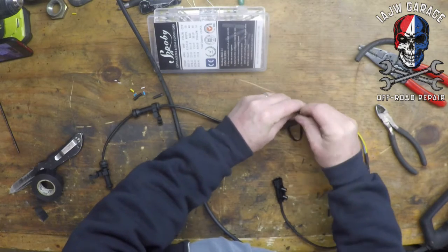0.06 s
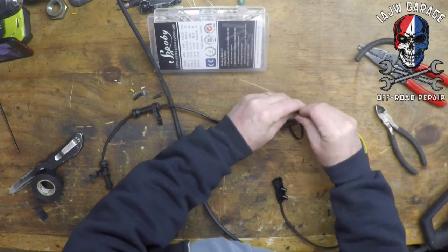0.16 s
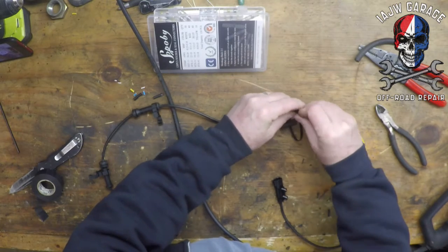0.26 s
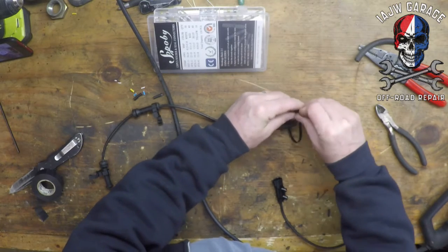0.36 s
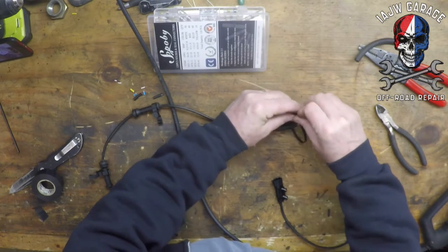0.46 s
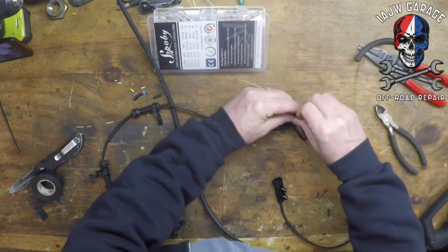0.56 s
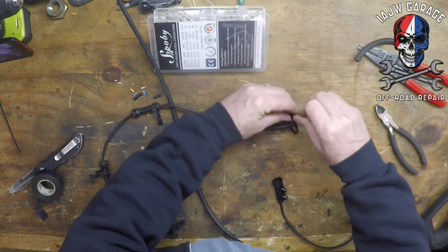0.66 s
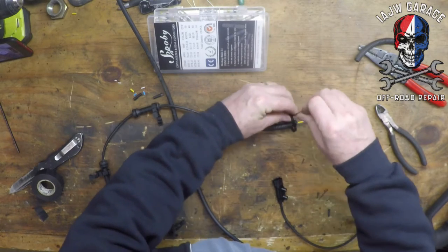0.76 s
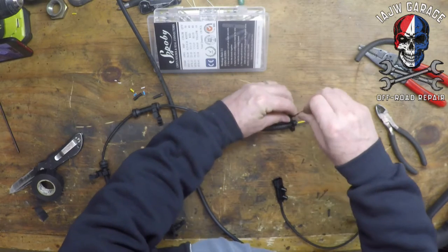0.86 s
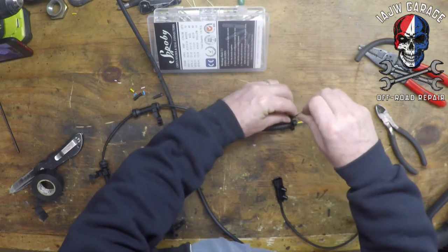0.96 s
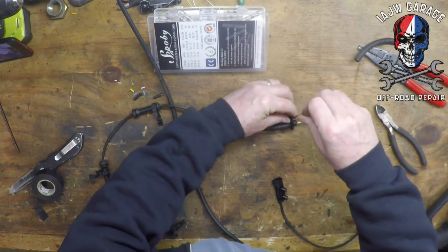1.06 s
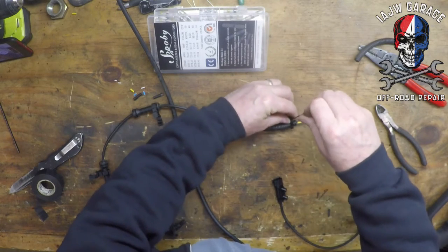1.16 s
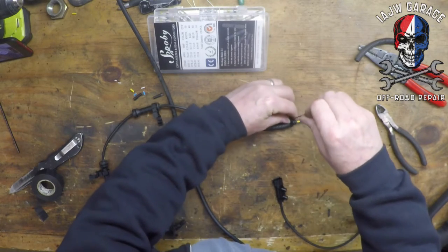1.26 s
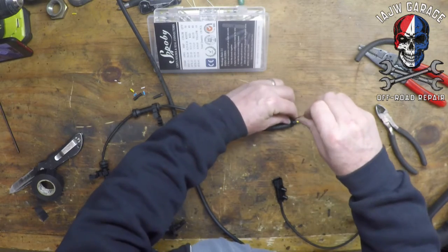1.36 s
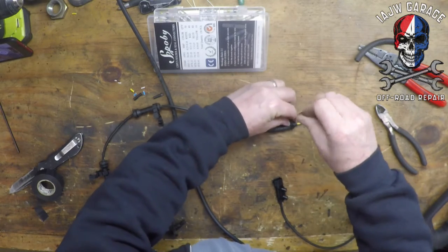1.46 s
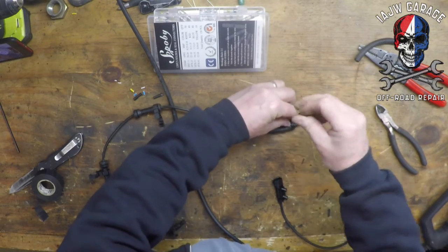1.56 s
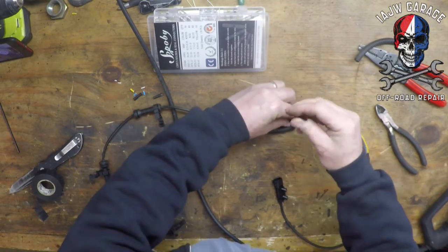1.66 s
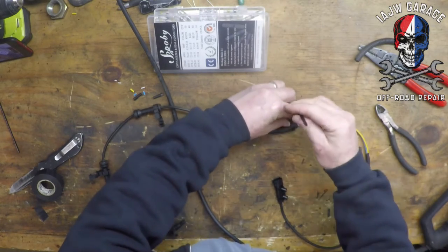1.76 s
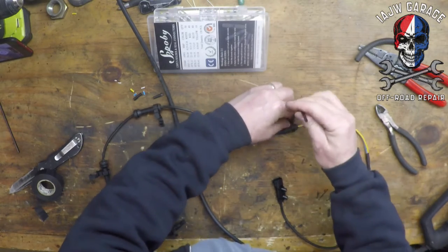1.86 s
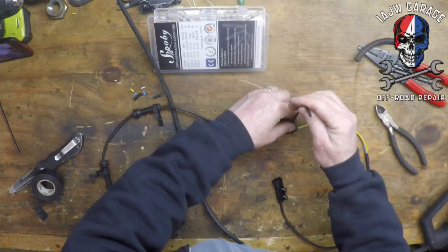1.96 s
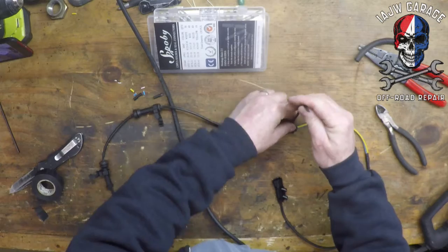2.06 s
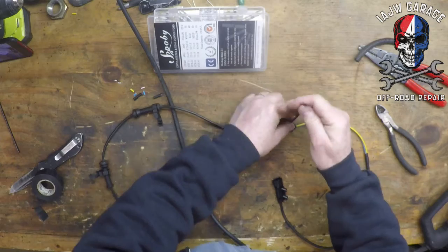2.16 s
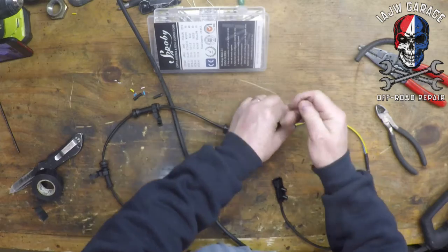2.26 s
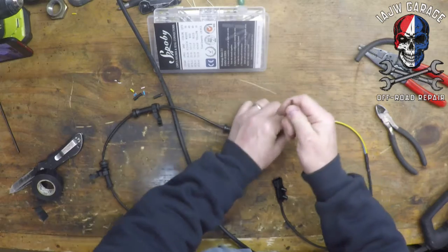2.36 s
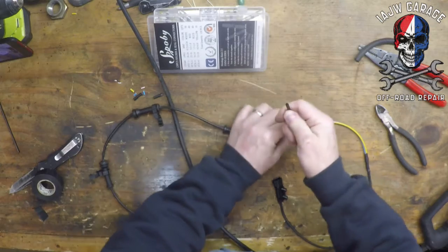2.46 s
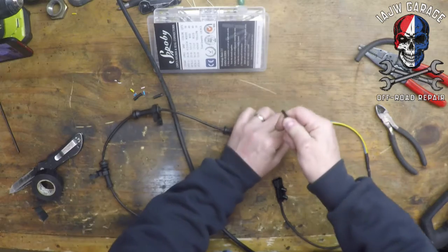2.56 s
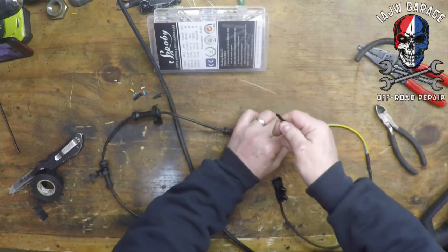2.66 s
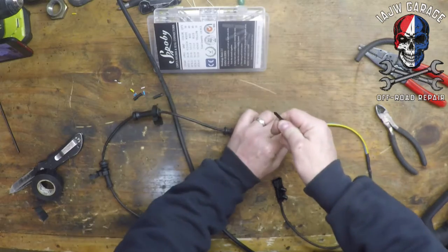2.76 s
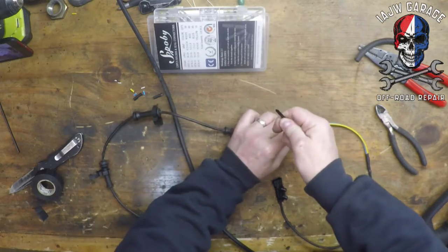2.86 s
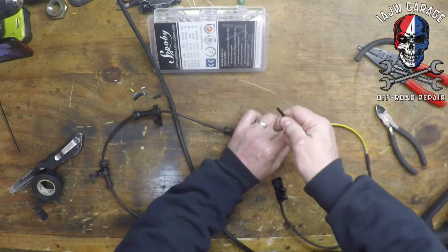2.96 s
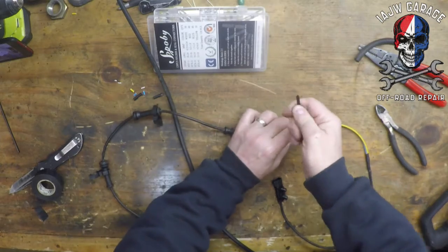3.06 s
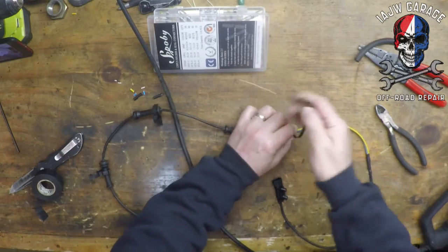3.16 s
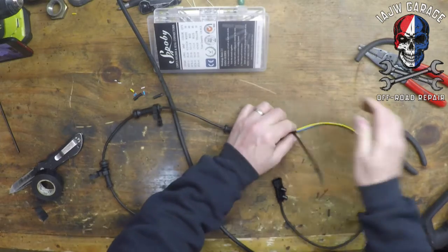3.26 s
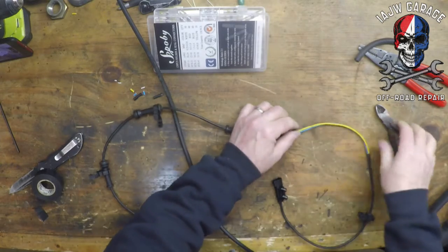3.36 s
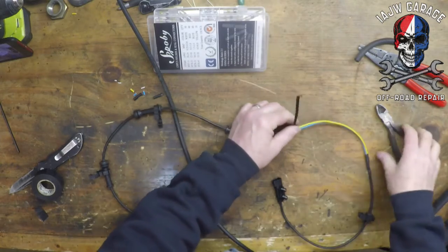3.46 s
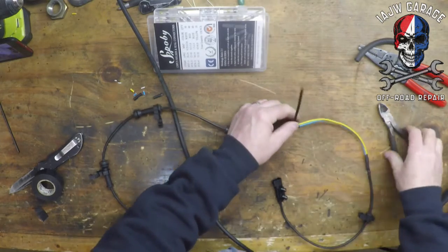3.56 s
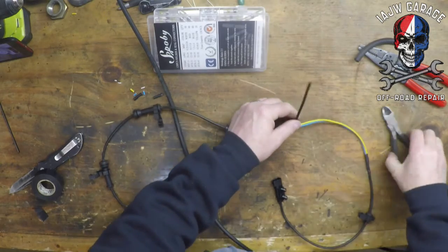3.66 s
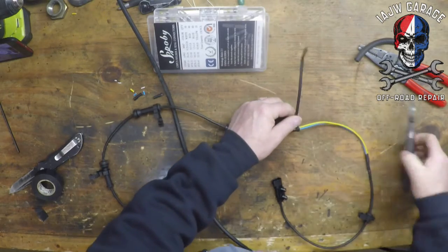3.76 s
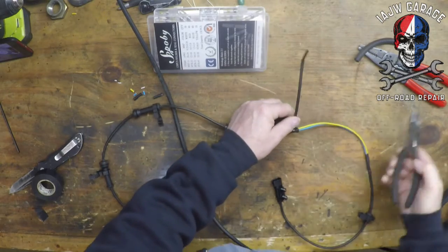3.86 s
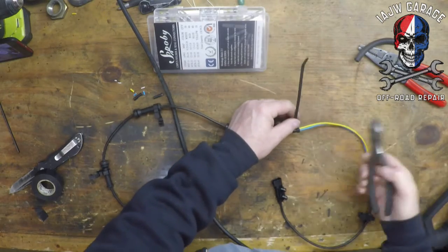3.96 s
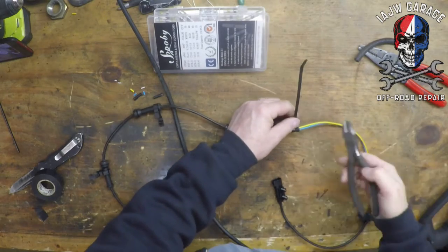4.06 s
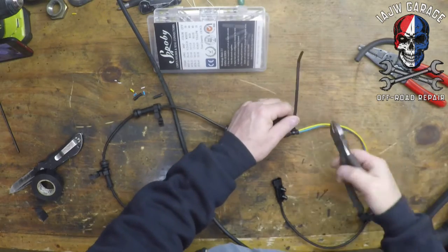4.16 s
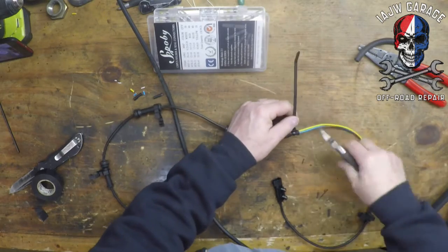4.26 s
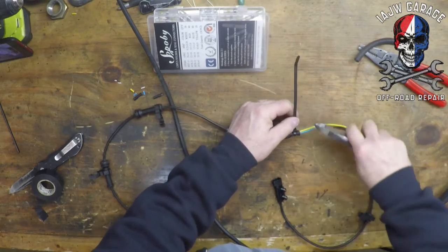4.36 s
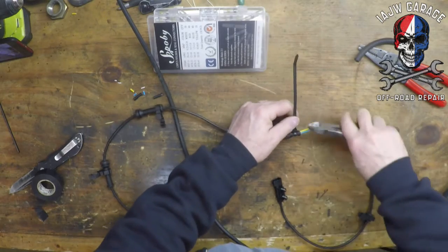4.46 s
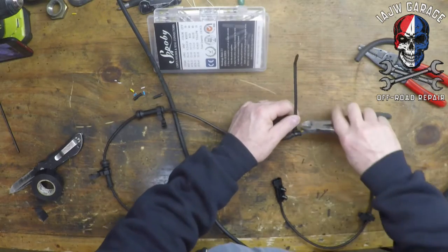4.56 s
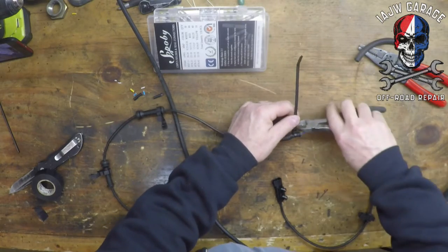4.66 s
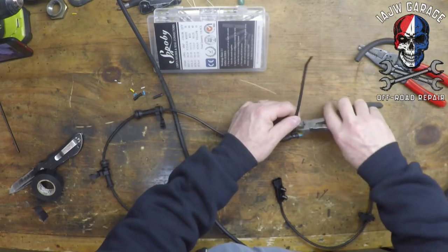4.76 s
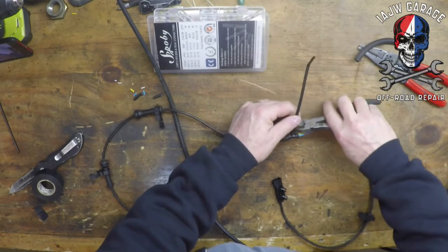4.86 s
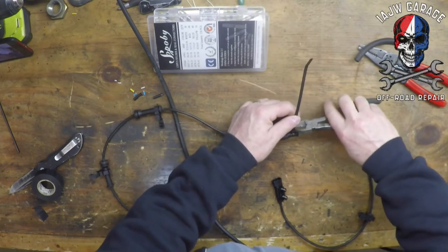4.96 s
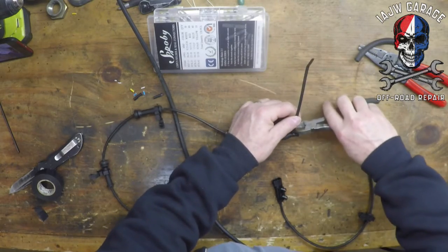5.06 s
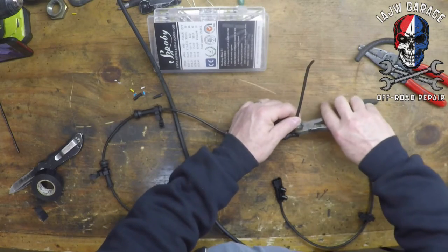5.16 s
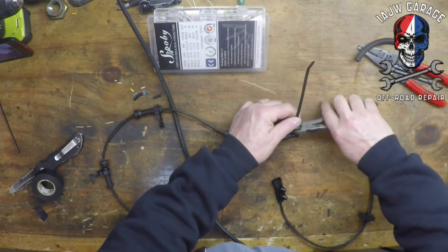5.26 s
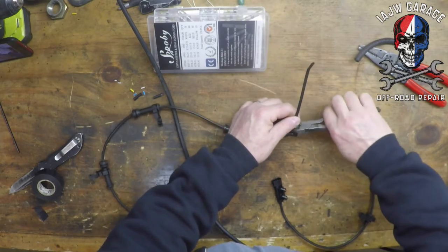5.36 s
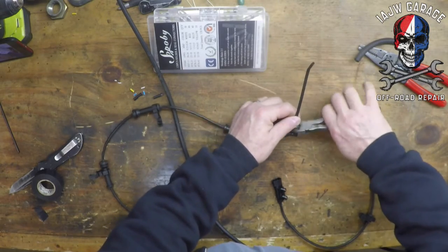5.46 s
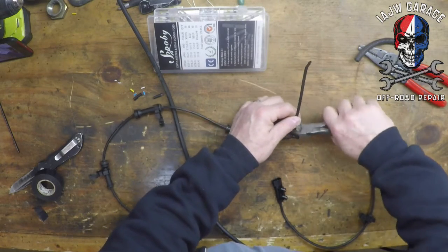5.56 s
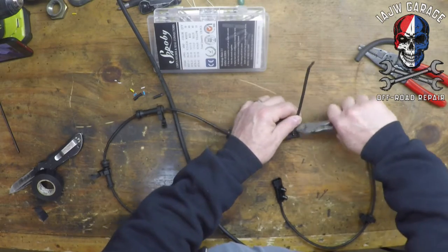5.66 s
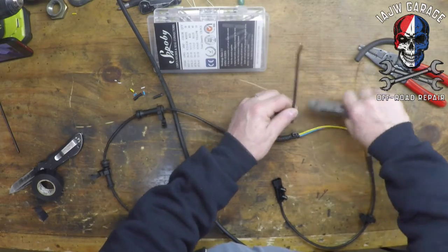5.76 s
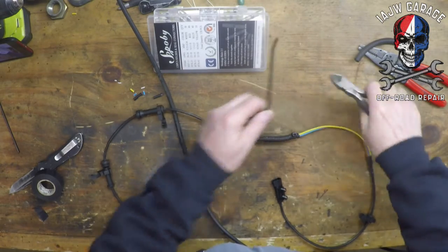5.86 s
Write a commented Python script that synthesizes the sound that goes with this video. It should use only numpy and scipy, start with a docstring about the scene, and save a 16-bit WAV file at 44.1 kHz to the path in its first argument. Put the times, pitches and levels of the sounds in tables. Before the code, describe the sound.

Two ratcheting rasps of a cable tie, a loud knock on wood and a sharp snip of cutters in a garage.

```python
"""A plastic cable tie is drawn tight over a wooden workbench in a garage. After a few light bumps, the
pawl rattles over the teeth in one long pull (0.6-1.4 s), each tooth exciting the modes of the tie. A
second, halting pull follows at 2.4 s. Hands and cable then rub and knock the bench, loudest at 3.7 s,
as cutters are picked up; at 5.7 s the jaws snip the tail off with a crack and a ring of steel.
The garage reverberates throughout, over faint air noise and hum."""
import sys
import numpy as np
from scipy import signal
from scipy.fft import rfft, irfft
from scipy.io import wavfile
from scipy.ndimage import uniform_filter1d

SR = 44100
rng = np.random.default_rng(int(sys.argv[2]) if len(sys.argv) > 2 else 0)


def transcribe(signal):
    """Save signal, clipped to [-1, 1], as a 16-bit WAV file at the path in sys.argv[1]."""
    frames = np.atleast_2d(signal).T
    limited = np.clip(frames, -1, 1)
    pcm = np.round(limited * 32767).astype(np.int16)
    wavfile.write(sys.argv[1], SR, pcm)


N = 261181

# Speed of the strap in the long pull. Each row: time in seconds, teeth per second.
PULL_SPEED = [(.6302, 69), (.6736, 370), (.6946, 516), (.7106, 504), (.7486, 314), (.7936, 185),
              (.8636, 160), (.9086, 58), (.9486, 141), (.9836, 70), (1.1136, 88), (1.1486, 116),
              (1.2586, 131), (1.2986, 92), (1.3586, 73), (1.4016, 10)]
# Snap of the pawl in the long pull.
# Each row: time in seconds, level in dB, treble lift in dB, damping of the loop from 0 to 1.
PULL_SNAP = [(.63, -35.5, 1, 0.8), (.69, -34.5, -1.5, 0.5), (.76, -35, -7, 0.12), (.86, -37.5, 0, 0.2),
             (.95, -37, -4.5, 0.02), (1.03, -40.5, 1.5, 0.14), (1.13, -42.5, 8, 0), (1.24, -40.5, 0, 0.56),
             (1.4, -42.5, 0, 0.86)]
# Single teeth of the halting pull.
# Each row: start in seconds, level in dB, damping of the loop from 0 to 1, treble lift in dB.
HALTING_TEETH = [(2.4123, -39, .05, 3), (2.4234, -37, .05, 0), (2.434, -37.5, .1, -9), (2.44, -37, .3, -4),
                 (2.449, -38, .1, .5), (2.46, -37, .3, 3), (2.478, -31, 0.6, -3), (2.5133, -39, .05, 5),
                 (2.528, -35, .4, 0), (2.5434, -39, .05, 2), (2.5536, -36, .05, 4), (2.5656, -36, .5, 1),
                 (2.5813, -39, 0.5, -1.5), (2.6034, -40, .7, -2), (2.6355, -41.5, 0.9, -2),
                 (2.6799, -43.5, .95, 0.5), (2.7145, -45, .95, -1.5), (2.7325, -46, .5, 3),
                 (2.7623, -47, 0.6, 0), (2.7819, -49.5, 0.8, 1), (2.814, -55, .6, -4)]
# The shrinking loop drops in pitch while the freed strap rises.
# Each row: time in seconds, tuning factor of the loop, tuning factor of the strap.
TUNING = [(.63, 1.07, .88), (.76, 1.1, .9), (.82, 1.02, .97), (.89, .99, 1.02), (1.0, .99, 1.0),
          (1.4, 1.0, 1.0)]
# Modes of the tie's five parts, low to high. Each row: frequency in Hz, bandwidth in Hz, level in dB.
LOOP_MODES = [(420, 220, -23.5), (870, 630, -16), (1847, 66, -24), (2460, 460, -1.5), (2780, 450, -44)]
STRAP_MODES = [(3260, 630, 3), (3750, 400, -11)]
TAIL_MODES = [(4120, 1250, -12), (5140, 610, -2.5), (5320, 2000, 3.5), (6280, 235, -11), (6120, 490, -17),
              (7090, 1360, -3)]
HEAD_MODES = [(9270, 1600, -2.5), (9700, 300, -10), (10430, 1270, -4.5), (10550, 440, -10)]
PAWL_MODES = [(12500, 1000, -41), (12100, 1080, -5), (13200, 2300, 0.5), (13800, 1300, -0.5),
              (15000, 550, -6)]
# Balance of those five parts. Each row: level in dB, change at full damping in dB, share of the
# treble lift, change in the halting pull in dB, further change once the head is pinched in dB.
PART_BALANCE = [(0.5, -8, -0.13, 1, -3.5), (-2, -3, 0.35, 3, -8.5), (.5, -1.5, -0.098, 3.5, 0),
                (-1.5, 2, 0.6, -4.5, 8), (2, 6.5, 0.74, -2.5, -7.5)]
# Spectrum of the cut. Each row: frequency in Hz, spectral density in dB.
SNIP_SPECTRUM = [(600, -12), (1400, -37), (1850, -10.5), (2400, 1.5), (3400, -13.5), (4100, -2.5),
                 (5300, 2), (6400, -5), (8000, -6.5), (11500, -15.5), (14300, -8.5), (15300, -22),
                 (16500, -47.5)]
# Modes of the cutters. Each row: frequency in Hz, level in dB, 60 dB decay time in seconds.
STEEL_MODES = [(1750, -20, .03), (1820, -15, .035), (2370, -18, .025), (4100, -23, .035), (4260, -27, .06),
               (4550, -24, .03), (4820, -17, .03), (5220, -13, .022), (5600, -20, .015), (6220, -19, .015)]
# Ticks and cracks of plastic and cable. Each row: start in seconds, level in dB, pitch in Hz.
PLASTIC_TICKS = [(0.102, -40.5, 3260), (0.338, -42, 3250), (.392, -41.5, 3370), (1.4618, -51, 1830),
                 (1.8891, -38.5, 3390), (2.393, -48, 3620), (2.434, -24, 4000), (2.4897, -12, 4610),
                 (2.4952, -18, 5000), (2.522, -22.5, 4510), (2.548, -25.5, 5100), (3.129, -49, 4900),
                 (3.632, -41.5, 4720), (4.5736, -48, 3530), (4.692, -51, 4600), (5.164, -56, 4950),
                 (5.562, -48.5, 4730), (5.6043, -45.5, 3780)]
# Bumps on the bench.
# Each row: start in seconds, blow level in dB, knock level in dB, weight in dB gained per octave down.
BENCH_BUMPS = [(0.121, -43, -70, -1), (0.327, -42.5, -76, 3), (.393, -45, -68, 2),
               (1.463, -39, -52.5, -8.5), (1.504, -39, -59, 10), (3.129, -33, -59, 12),
               (3.238, -36, -80, 11), (3.2875, -16.5, -42, -2.5), (3.553, -33.5, -61, 1),
               (3.589, -30.5, -62.5, 11.5), (3.682, -1.5, -35, 2), (3.695, -8.5, -52, -2),
               (3.712, -12.5, -57, -1.5), (4.21, -43.5, -61, 2), (4.549, -43, -60.5, -4),
               (4.825, -37.5, -62, 6), (5.3877, -20, -47, 0), (5.674, -23, -48, -6),
               (5.693, -14.5, -42, -1.5)]
# Modes of the bench. Each row: frequency in Hz, level in dB, 60 dB decay time in seconds.
WOOD_MODES = [(138, -23.5, 0.21), (239, -17.5, 0.099), (268, -9.5, 0.1), (314.7, -21, 0.13),
              (379, -15.5, 0.027), (419, -3, 0.083), (507, -11, 0.067), (626.4, -11, 0.079),
              (733, -17.5, 0.066), (858, -9, 0.043), (920, -15, 0.12), (1023, -13.5, 0.072),
              (1125, -11, 0.047), (1252, -17, 0.06)]
# Spectrum of a dry knock. Each row: frequency in Hz, spectral density in dB.
KNOCK_SPECTRUM = [(700, -6), (1500, -8.5), (2500, 0.5), (3500, -7.5), (5000, -15), (8000, -32),
                  (16000, -56)]
# Hands and cable dragging on the bench. Each row: start in seconds, length in seconds, level in dB.
DRAG_STROKES = [(0.748, 0.26, -57), (1.163, 0.21, -49), (2.422, 0.14, -36), (2.647, 0.33, -61),
                (3.154, 0.042, -52.5), (3.41, 0.11, -53.5), (3.626, 0.13, -37.5), (5.384, 0.028, -42.5),
                (5.646, 0.076, -43)]
# Resonances of the rubbed bench. Each row: frequency in Hz, bandwidth in Hz, spectral density in dB.
RUB_BANDS = [(137, 73, -7.5), (254.2, 32, 2.5), (322, 83, -6), (419, 80, -7), (714, 260, -22),
             (1003, 49, -24), (1250, 190, -38.5), (3000, 1200, -38.5)]
# Faint squeaks. Each row: centre in seconds, length in seconds, level in dB.
SQUEAK_EVENTS = [(.435, .05, -74), (4.723, 0.044, -73), (5.463, 0.1, -73)]
# A faint hiss while the cutters travel. Each row: time in seconds, level in dB.
HISS_LEVEL = [(3.55, -93), (3.65, -67.5), (4.22, -76), (4.35, -90)]
# Reverberation of the garage. Each row: frequency in Hz, level in dB, 60 dB decay time in seconds.
GARAGE_DECAY = [(154, -24, 0.046), (505, -16.5, 0.71), (1420, -13, 0.44), (2350, -12.5, 0.41),
                (3300, -13.5, 0.41), (4400, -14.5, 0.63), (4930, -8, 0.3), (6870, -21.5, 0.48),
                (15000, -8, 0.18)]
# Background hum. Each row: frequency in Hz, bandwidth in Hz, level in dB.
HUM_BANDS = [(40.4, 21.5, -57), (121.5, 2.2, -59.5), (431, 27, -73), (705.4, 22, -78.5), (1878, 98, -82.5),
             (5060, 540, -80.5)]
# Air noise and rumble. Each row: frequency in Hz, spectral density in dB.
AIR_SPECTRUM = [(12, -32), (20, -6), (48, 0.5), (65, -8), (123, -11), (146, -17.5), (248, -22), (367, -27),
                (558, -34.5), (1060, -40), (5080, -44.5), (14700, -56.5), (16000, -54)]

PINCH_S = 2.52   # fingers pinch the head
SWELL_S, SWELL_LENGTH_S, SWELL_DB = 1.245, .075, 8   # the tail rings louder late in the long pull
SWELL_HZ, SWELL_WIDTH_HZ = 4975, 300
HALTING_WIDEN = 1.02   # the gripped tie rings a little shorter in the halting pull
# Reflections of the rattle off the bench. Each row: delay in seconds, level in dB.
BENCH_ECHOES = ((.0018, -8), (.0037, -11), (.0062, -14))


def ratchet(pull, wander_db=2.0, uneven_db=1.0, detune=.015, spread_s=.0008, jitter_s=.000012):
    """Impulse excitation: each tooth flicks the pawl, and the tie's damped modes answer in turn."""
    snap_s, snap_db, snap_lift, snap_damping = np.transpose(PULL_SNAP)
    halt_s, halt_db, halt_damping, halt_lift = np.transpose(HALTING_TEETH)
    tuning_s, loop_tuning, strap_tuning = np.transpose(TUNING)
    times = np.append(pull, halt_s)
    halting = times > pull[-1]
    tunings = [np.interp(times, tuning_s, loop_tuning), np.interp(times, tuning_s, strap_tuning), 1, 1, 1]
    force_db = np.append(np.interp(pull, snap_s, snap_db), halt_db)
    lift_db = np.append(np.interp(pull, snap_s, snap_lift), halt_lift)
    damping = np.append(np.interp(pull, snap_s, snap_damping), halt_damping)
    swell_db = SWELL_DB * np.exp(-((times - SWELL_S) / SWELL_LENGTH_S) ** 2)
    since_tooth = (np.arange(500) - (times * SR % 1)[:, None]) / SR
    parts = (LOOP_MODES, STRAP_MODES, TAIL_MODES, HEAD_MODES, PAWL_MODES)
    snaps = 0
    for modes, tuning, balance in zip(parts, tunings, PART_BALANCE):
        part_db, damping_db, lift_share, halting_db, pinch_db = balance
        level_db = force_db + part_db + damping_db * damping + lift_share * lift_db
        level_db += halting_db * halting + pinch_db * (times > PINCH_S)
        for hz, width_hz, db in modes:
            louder, higher, uneven, late = rng.standard_normal((4, len(times)))
            louder, higher = (rms_one(uniform_filter1d(v, size=21)) for v in (louder, higher))
            swell_share = np.exp(-((hz - SWELL_HZ) / SWELL_WIDTH_HZ) ** 2)
            gain = amp(level_db + db + wander_db * louder + uneven_db * uneven + swell_db * swell_share)
            # slight timing scatter blurs the pitch of the rattle in the treble only
            t = (since_tooth - spread_s * rng.random() - jitter_s * late[:, None]).clip(0)
            decay = np.pi * width_hz * np.where(halting, HALTING_WIDEN, 1)[:, None] * t
            envelope = decay * np.exp(1 - decay)   # rises briefly, then dies
            pitch = hz * tuning * (1 + detune * higher)
            snaps = snaps + gain[:, None] * envelope * np.sin(2 * np.pi * pitch[:, None] * t)
    out = np.zeros(N)
    for s, snap in zip(times, snaps):
        add(out, s, snap)
    return out + sum(amp(db) * np.roll(out, round(s * SR)) for s, db in BENCH_ECHOES)


def tooth_times():
    """Distance is the integral of speed: in the long pull a tooth passes at each whole unit of it."""
    t = np.arange(PULL_SPEED[0][0], PULL_SPEED[-1][0], 1 / SR)
    teeth_passed = np.cumsum(np.interp(t, *np.transpose(PULL_SPEED))) / SR
    return np.interp(np.arange(int(teeth_passed[-1]) + 1), teeth_passed, t)


def cutters(start_s=5.6733, crack_db=-1, rise_s=0.00141, decay_s=.034):
    """Fracture: the jaws close through the strap with a broadband crack, and the steel rings freely."""
    t = np.arange(2048) / SR
    envelope = amp(-60 * t / decay_s) * (1 - np.exp(-t / rise_s))
    colour = spectral_gain(SNIP_SPECTRUM, len(t))
    crack = rng.standard_normal(len(t))
    for _ in range(8):   # the phases of a dying noise under a smooth spectrum without holes
        dying = np.sign(crack) * np.sqrt(np.abs(crack) * envelope)
        crack = irfft(colour * np.exp(1j * np.angle(rfft(dying))), len(t))
    fade = np.minimum(t / rise_s, 1) * (1 - t / t[-1]) ** 2
    out = sum(ring(clicks([start_s + rise_s], amp(db)), hz, t60) for hz, db, t60 in STEEL_MODES)
    add(out, start_s, amp(crack_db) * fade * crack / np.abs(crack).max())
    return out


def ticks(relative_width=.7, t60_s=0.027):
    """Damped vibration: plastic and cable tick as a short tone in a dying band of noise."""
    out, t = np.zeros(N), np.arange(round(.08 * SR)) / SR
    for s, db, hz in PLASTIC_TICKS:
        splash = rms_one(resonance(rng.standard_normal(len(t)), hz, relative_width * hz))
        burst = 0.42 * np.sin(2 * np.pi * hz * t) + 0.29 * splash
        add(out, s, amp(db - 60 * t / t60_s) * burst)
    return out


def bench(pull, teeth_db=-44, contact_s=0.00034, knock_t60_s=0.06, low_cut_hz=110):
    """Modal response: bumps and teeth drive the wood through a soft contact; bumps add a dry knock."""
    starts, blow_db, knock_db, weight_db = np.transpose(BENCH_BUMPS)
    teeth = amp(teeth_db) * clicks(pull, 0.61)
    out = np.zeros(N)
    for k, (hz, db, t60) in enumerate(WOOD_MODES):
        scatter = amp(rng.normal(0, 2, len(starts)))
        blows = clicks(starts, amp(blow_db + weight_db * np.log2(420 / hz)) * scatter)
        out += ring((-1) ** k * amp(db) * (blows + teeth), hz, t60)   # neighbours start in antiphase
    pole = np.exp(-1 / (contact_s * SR))   # a soft contact is a low-pass
    out = signal.lfilter([(1 - pole) ** 2], [1, -2 * pole, pole * pole], out)
    radiation = signal.butter(2, low_cut_hz, "high", fs=SR, output="sos")   # wood radiates little bass
    out = signal.sosfilt(radiation, out)
    t = np.arange(round(.08 * SR)) / SR
    attack = np.minimum(t / 0.00037, 1)
    for s, db in zip(starts, knock_db):
        add(out, s, coloured(KNOCK_SPECTRUM, len(t)) * amp(db - 60 * t / knock_t60_s) * attack)
    return out


def drag(lumpy_db=1.5, rise_db_per_s=503, fall_db_per_s=263, rest_db=-63):
    """Sliding friction: lumpy noise from hands and cable drives the bench's resonances."""
    t = np.arange(N) / SR
    level = np.full(N, amp(rest_db))   # resting hands still rub a little
    for s, length, db in DRAG_STROKES:
        level += amp(db - rise_db_per_s * (s - t).clip(0) - fall_db_per_s * (t - s - length).clip(0))
    lumps = rms_one(uniform_filter1d(uniform_filter1d(rng.standard_normal(N), size=900), size=900))
    friction = rng.standard_normal(N) * amp(lumpy_db * lumps)
    wood = sum(amp(db) * narrow_band(friction, hz, width) * np.sqrt(width) for hz, width, db in RUB_BANDS)
    return level * rms_one(wood)


def squeaks(pitch_hz=6650, waver_hz=40, octave_db=-5):
    """Random frequency modulation: thin, slightly unsteady tones with their second harmonic."""
    t = np.arange(N) / SR
    gate = sum(amp(db) * np.exp(-(2 * (t - s) / length) ** 4) for s, length, db in SQUEAK_EVENTS)
    waver = rms_one(uniform_filter1d(rng.standard_normal(N), size=200))
    phase = 2 * np.pi * np.cumsum(pitch_hz + waver_hz * waver) / SR
    return gate * (np.sin(phase) + amp(octave_db) * np.sin(2 * phase))


def hiss(centre_hz=1864, width_hz=150):
    """Narrow-band noise: a faint hiss swells and fades while the cutters travel."""
    level = amp(np.interp(np.arange(N) / SR, *np.transpose(HISS_LEVEL)))
    return level * narrow_band(rng.standard_normal(N), centre_hz, width_hz)


def garage(x, build_up_s=0.0073):
    """Reverberation: a diffuse field builds up, then each third-octave band decays at its own rate."""
    hz, db, t60 = np.transpose(GARAGE_DECAY)
    t = np.arange(round(.6 * SR)) / SR
    edges_hz = 90 * 2 ** np.arange(0, 7.7, 1 / 3)
    tail = 0
    for low, high in zip(edges_hz, edges_hz[1:]):
        log_centre = np.log(np.sqrt(low * high))
        band_pass = signal.butter(2, [low, high], "band", fs=SR, output="sos")
        band = signal.sosfilt(band_pass, rng.standard_normal(len(t)))
        band_db, decay_s = (np.interp(log_centre, np.log(hz), column) for column in (db, t60))
        tail = tail + band * amp(band_db - 60 * t / decay_s) / np.sqrt(decay_s * SR / 14)
    return signal.fftconvolve(x, tail * np.clip(t / build_up_s, 0, 1) ** 2)[:N]


def background(air_db=-46.5):
    """Stationary noise: a broad spectrum is heard as air and rumble, narrow bands as wavering hum."""
    hum = sum(amp(db) * narrow_band(rng.standard_normal(N), hz, width) for hz, width, db in HUM_BANDS)
    return amp(air_db) * coloured(AIR_SPECTRUM, N) + hum


def amp(db):
    """Amplitude grows tenfold every 20 dB."""
    return 10 ** (np.asarray(db) / 20)


def rms_one(x):
    """Normalisation to unit power."""
    return x / np.sqrt(np.mean(x ** 2) + 1e-20)


def clicks(times, gains):
    """Ideal impulses at the given seconds."""
    out = np.full(N, 1e-18)
    np.add.at(out, np.round(np.asarray(times) * SR).astype(int), gains)
    return out


def ring(x, hz, t60):
    """Damped oscillator: a unit impulse starts a decaying sine of height 1."""
    r, w = amp(-60 / (t60 * SR)), 2 * np.pi * hz / SR
    return signal.lfilter([0, np.sin(w)], [1, -2 * r * np.cos(w), r * r], x)


def resonance(x, hz, width_hz):
    """Second-order resonance: a band-pass of peak gain 1."""
    r, w = np.exp(-np.pi * width_hz / SR), 2 * np.pi * hz / SR
    return signal.lfilter(np.array([1, 0, -1]) * (1 - r * r) / 2, [1, -2 * r * np.cos(w), r * r], x)


def narrow_band(x, hz, width_hz):
    """Two equal resonances in cascade pass a narrower band, here scaled to unit power."""
    return rms_one(resonance(resonance(x, hz, width_hz), hz, width_hz))


def spectral_gain(spectrum, size):
    """Spectral envelope: the gain of each Fourier bin, interpolated in dB over log frequency."""
    hz, db = np.transpose(spectrum)
    return amp(np.interp(np.log(np.fft.rfftfreq(size, 1 / SR) + 1), np.log(hz), db))


def coloured(spectrum, size):
    """Spectral shaping: white noise takes the given envelope, at unit power."""
    return rms_one(irfft(rfft(rng.standard_normal(size)) * spectral_gain(spectrum, size), size))


def add(out, s, sound):
    """Superposition of a short sound at s seconds."""
    at = int(s * SR)
    out[at:at + len(sound)] += sound


def scene():
    """Superposition: the bench's sounds and their reverberation, over squeaks, hiss and background."""
    pull = tooth_times()
    direct = ratchet(pull) + ticks() + bench(pull) + drag() + cutters()
    return (direct + garage(direct) + squeaks() + hiss() + background())[None]


def record(dry):
    """Soft saturation rounds the loudest peak; a low-pass removes the treble above 16.6 kHz."""
    rounded = .97 * np.tanh(dry / .97)
    return signal.sosfilt(signal.cheby2(12, 60, 16600, fs=SR, output="sos"), rounded)


dry = scene()
out = record(dry)
transcribe(out)
```